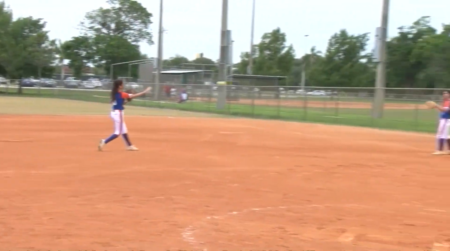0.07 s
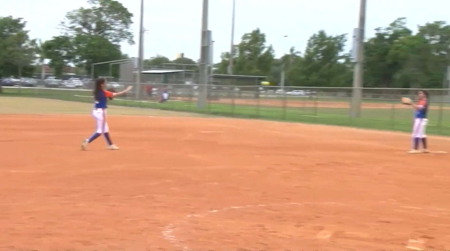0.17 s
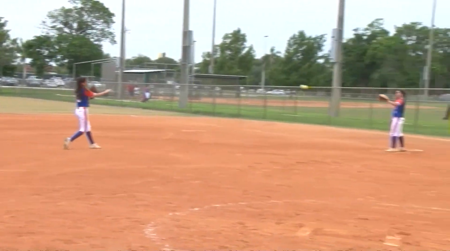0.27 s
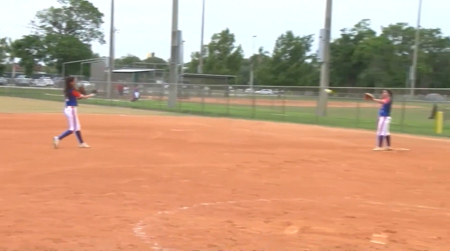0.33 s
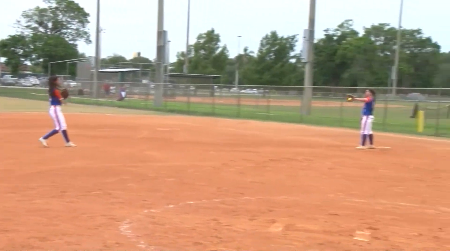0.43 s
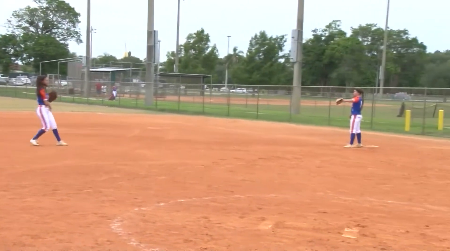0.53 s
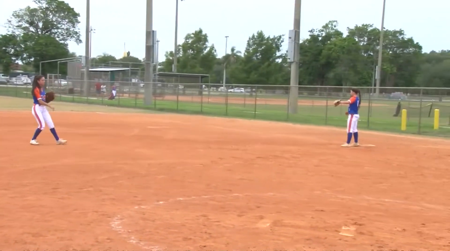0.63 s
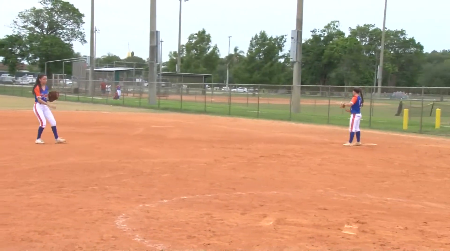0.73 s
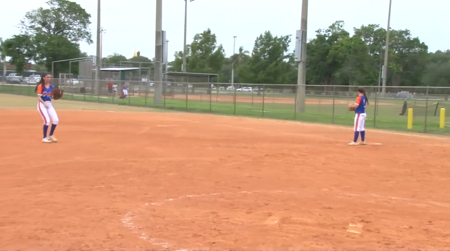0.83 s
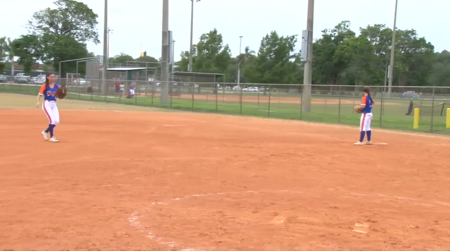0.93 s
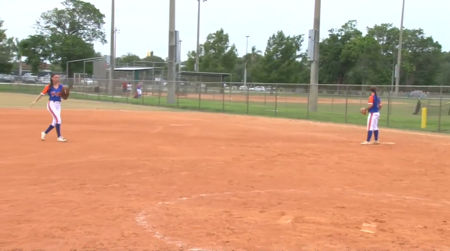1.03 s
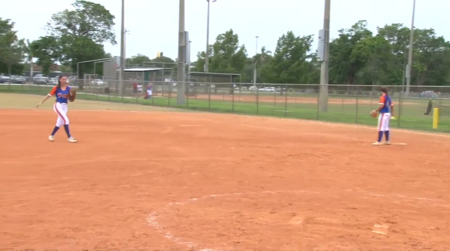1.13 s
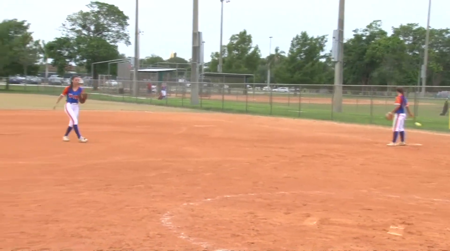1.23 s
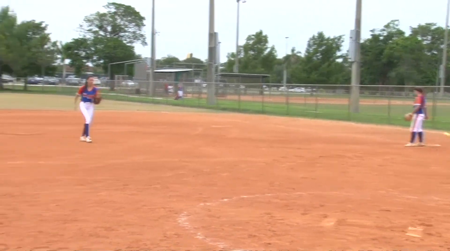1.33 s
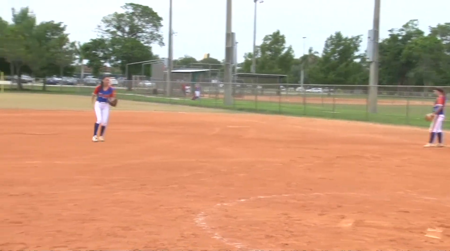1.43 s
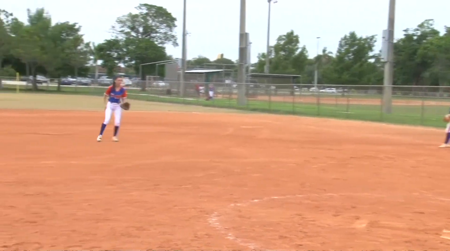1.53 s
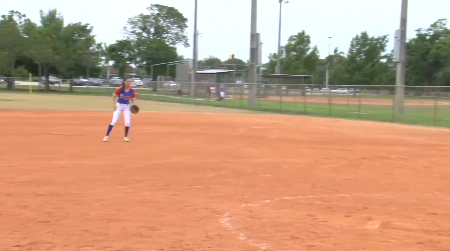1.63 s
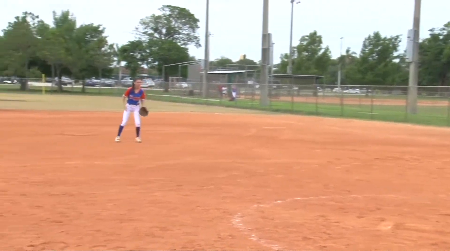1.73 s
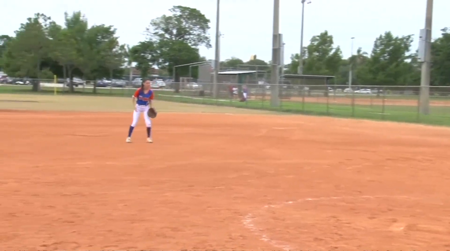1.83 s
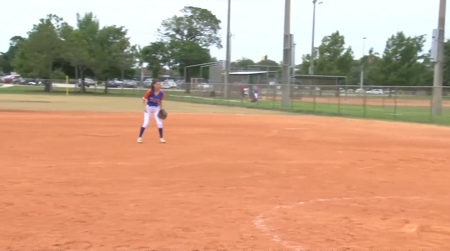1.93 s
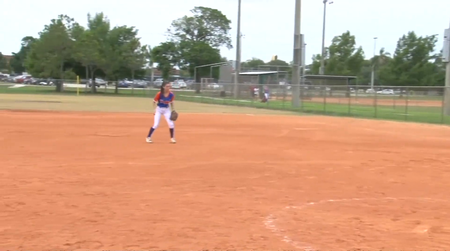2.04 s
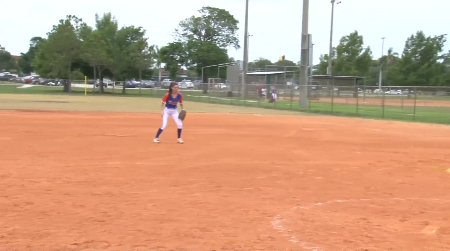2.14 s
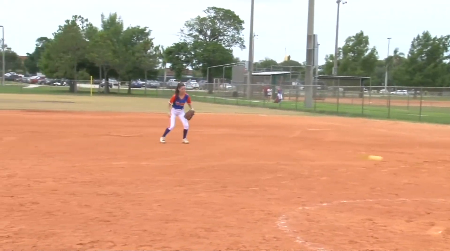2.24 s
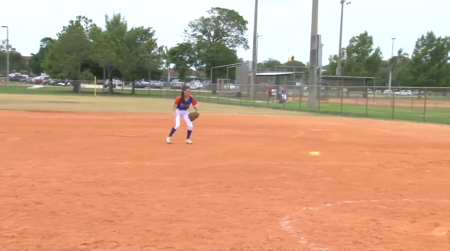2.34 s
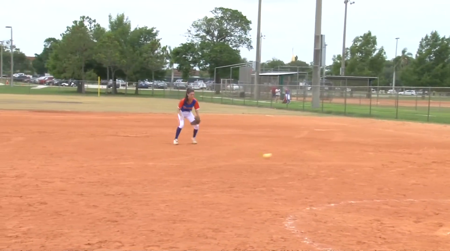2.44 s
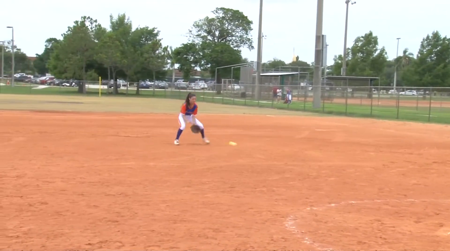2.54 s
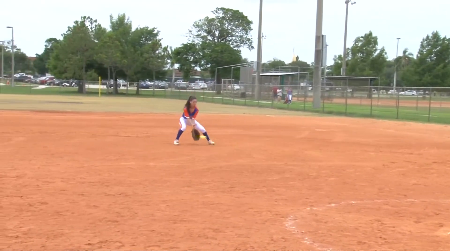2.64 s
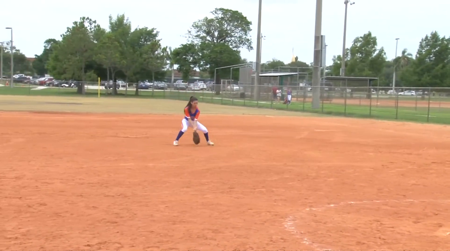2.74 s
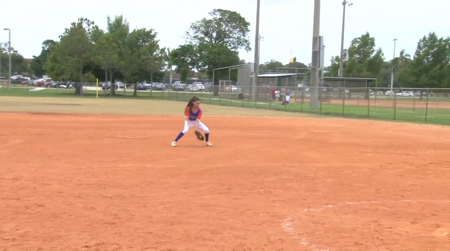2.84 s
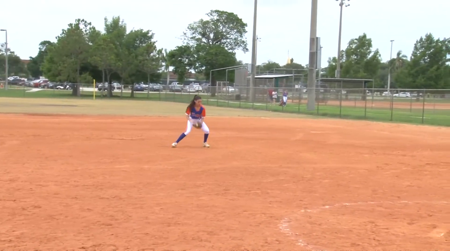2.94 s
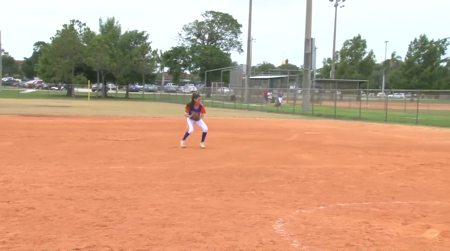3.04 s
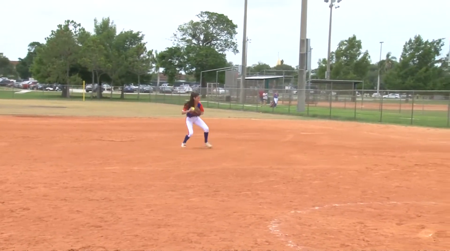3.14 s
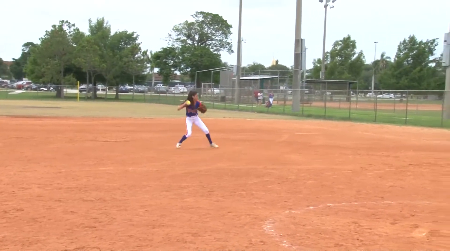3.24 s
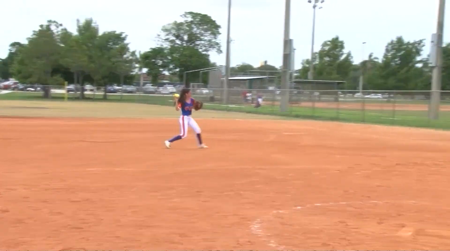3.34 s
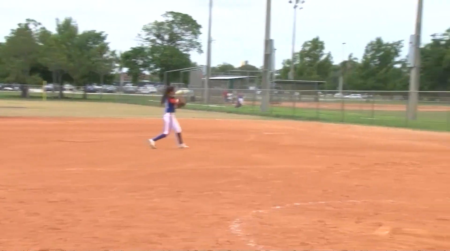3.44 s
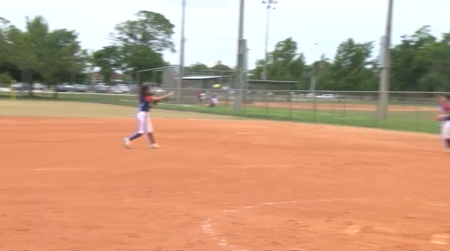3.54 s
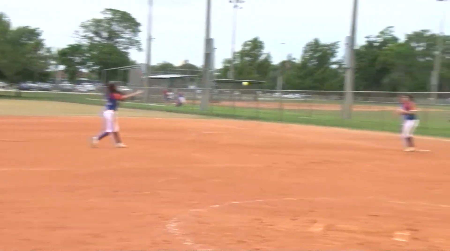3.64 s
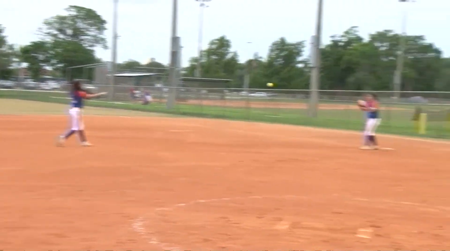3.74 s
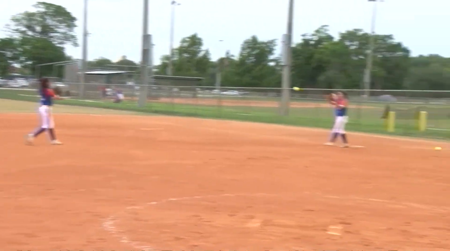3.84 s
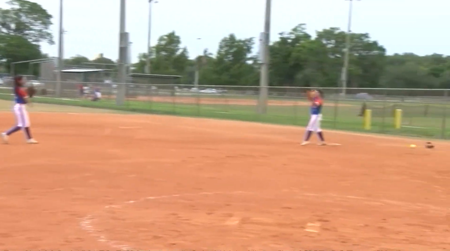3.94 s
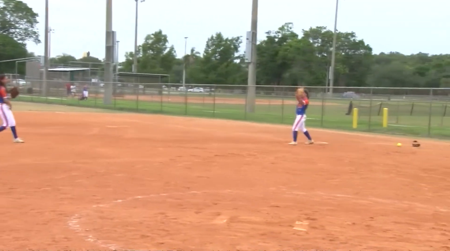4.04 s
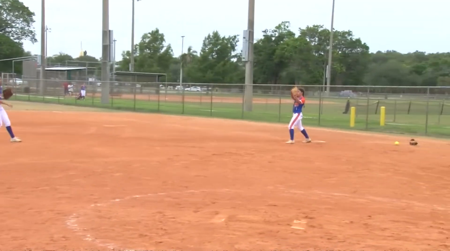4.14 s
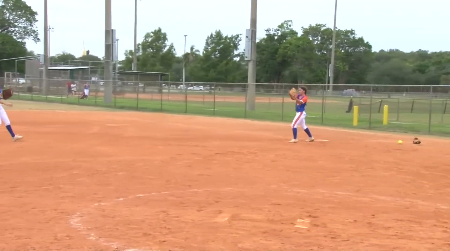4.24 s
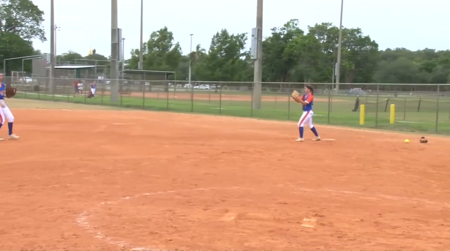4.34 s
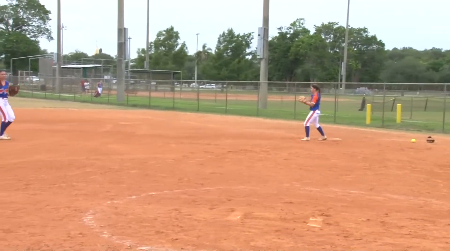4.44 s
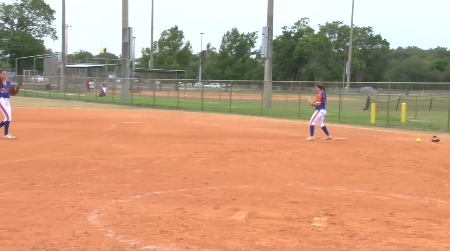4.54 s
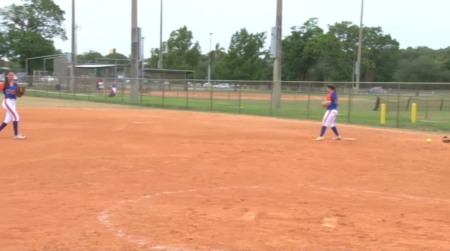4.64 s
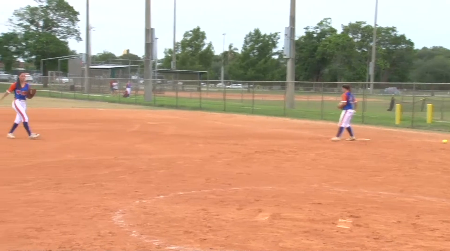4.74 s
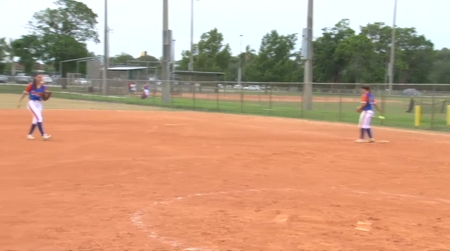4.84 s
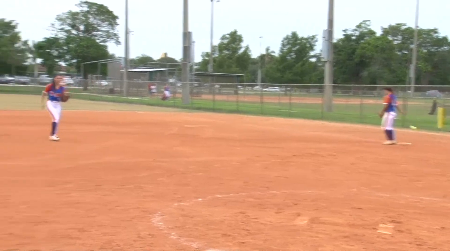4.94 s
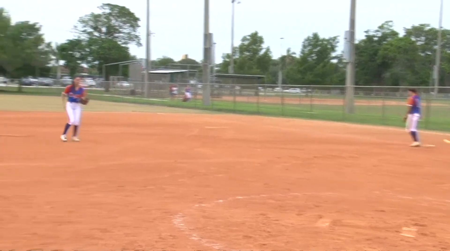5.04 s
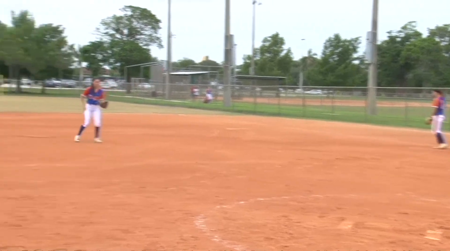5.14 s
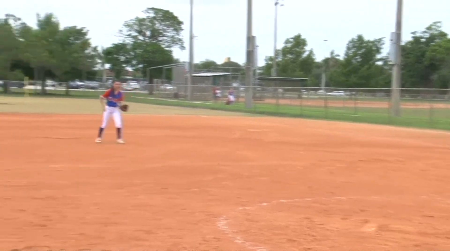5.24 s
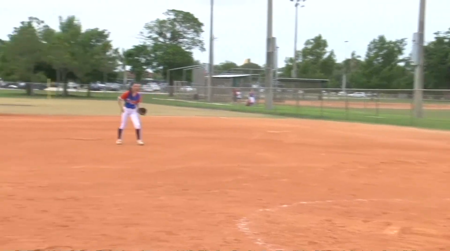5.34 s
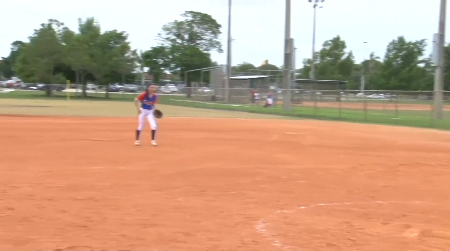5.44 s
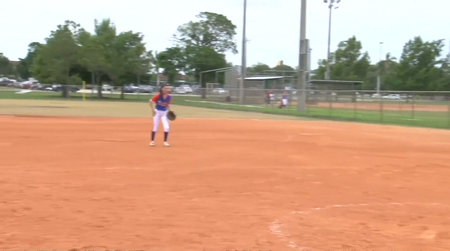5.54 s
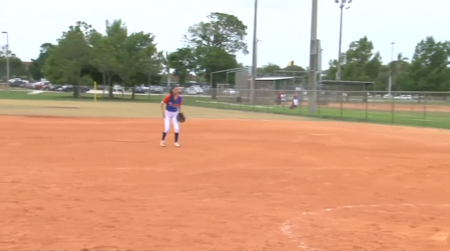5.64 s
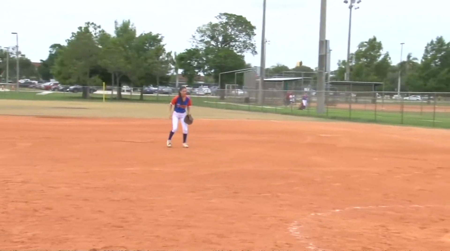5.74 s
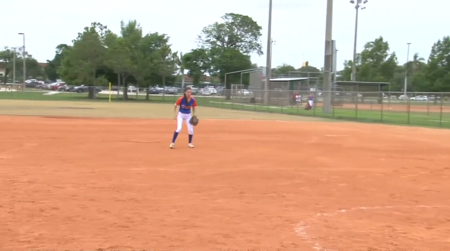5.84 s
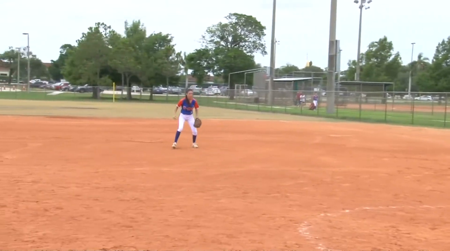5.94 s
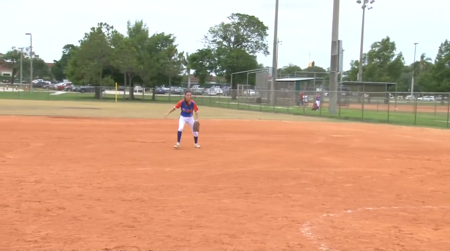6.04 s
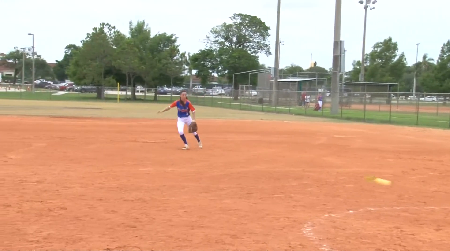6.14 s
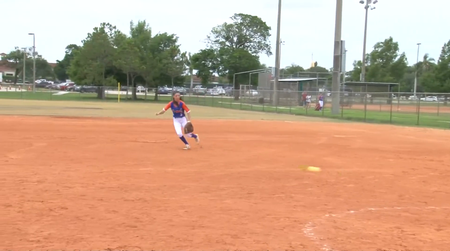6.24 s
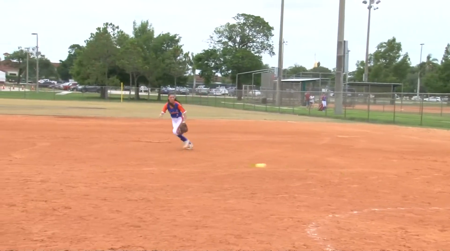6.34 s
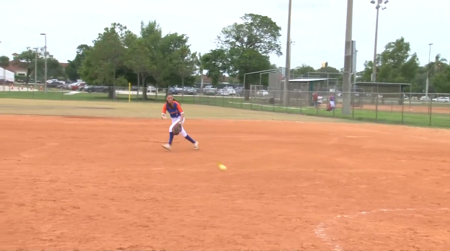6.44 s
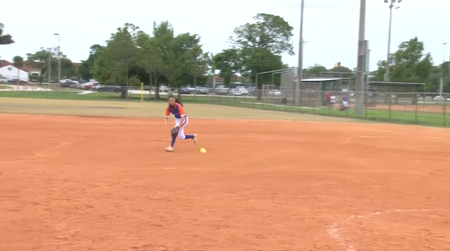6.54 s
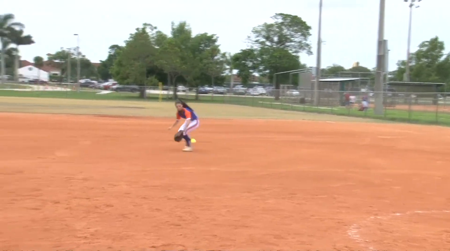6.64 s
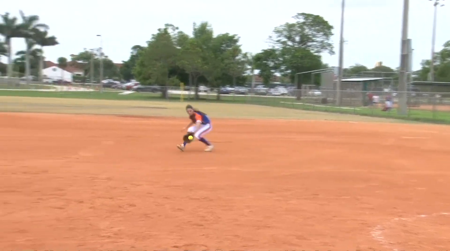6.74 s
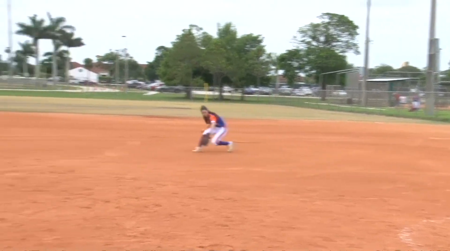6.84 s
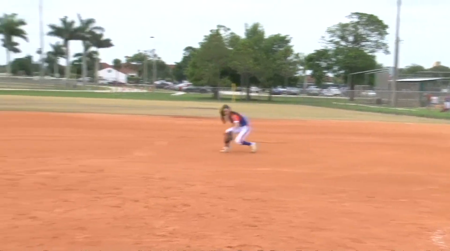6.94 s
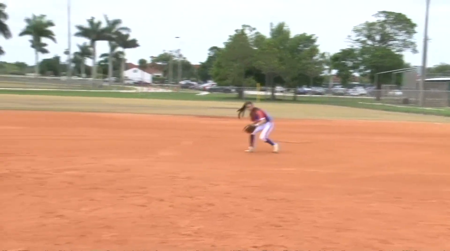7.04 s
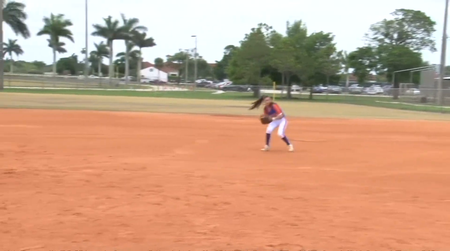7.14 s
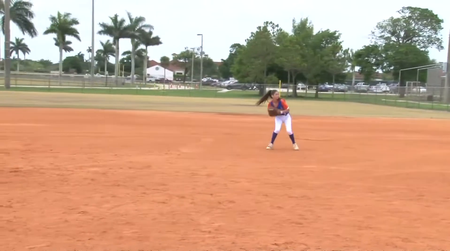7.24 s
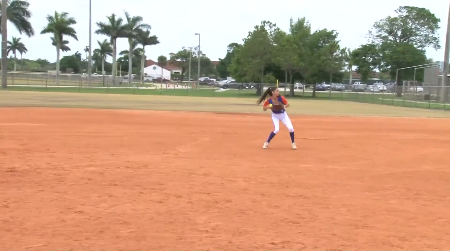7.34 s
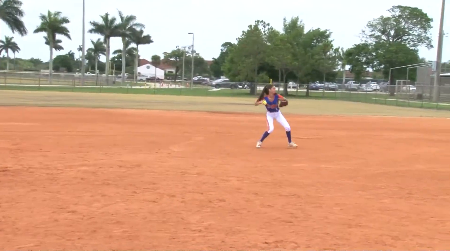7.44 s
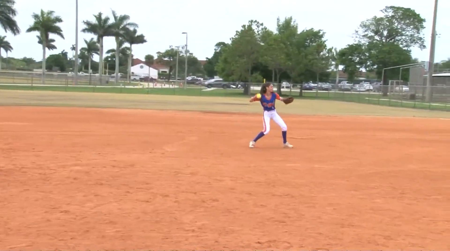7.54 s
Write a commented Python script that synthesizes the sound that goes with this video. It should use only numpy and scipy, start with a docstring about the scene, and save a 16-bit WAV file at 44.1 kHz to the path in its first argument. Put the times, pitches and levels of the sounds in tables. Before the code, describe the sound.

An open softball practice field with a low traffic hum, a soft distant wash and light wind rumble on the microphone. At 0.6 s a ball pops modestly into a leather glove with a gritty scuff and small echoes; a faint touch of leather follows at 1.0. Tiny falling chirps come around 1.5. At 1.9 a bat cracks sharply, with a crackling spray of echoes from fences and dugouts. The ball skips on clay at 2.15, then smacks hard into a glove at 2.9; another crisp glove smack lands at 4.1. Thin trilling and long drooping bird whistles sit behind, near 2.2, 4.7 and 6.3. Wind buffets harder from 5.5. A second bat crack at 5.8 echoes, clay ticks and thuds follow at 6.05 to 6.6, quick peeps come in threes, and a far metal ping sounds at 6.5. A deep glove thump lands at 6.95; gusty rumble and tree rush continue to 7.6.

```python
"""Wind rumbles on the microphone over humming traffic, then birds call: filtered noise and gliding sines.
At infield practice on an open softball field a ball skips over the clay and smacks into leather gloves,
and a bat knocks grounders: damped modes with short noise bursts. Dugouts, fences, ground and trees return
bat and glove hits as smeared noise. Metal pings once far off, and the wind is stronger towards the end."""
import sys
import numpy as np
from scipy import signal
from scipy.fft import rfft, irfft
from scipy.io import wavfile
from scipy.ndimage import uniform_filter1d

SR = 44100
rng = np.random.default_rng(int(sys.argv[2]) if len(sys.argv) > 2 else 0)


def unload_wav(signal):
    """Save mono or channel-first audio to the path in sys.argv[1] as 16-bit WAV at rate SR, clipped to [-1, 1]."""
    wavfile.write(
        sys.argv[1],
        SR,
        np.round(np.clip(np.atleast_2d(signal).T, -1, 1) * 32767).astype(np.int16),
    )


N = 335160
TIME = np.arange(N) / SR
PORT_LAG_S = 0.000454  # arrival difference between the two ports for sound far to one side


def from_db(db):
    """Logarithmic level: decibels to an amplitude gain."""
    return 10 ** (np.asarray(db) / 20)


def rms_one(x):
    """Power normalisation: scale to a mean square of one."""
    return x / np.sqrt(np.mean(x ** 2) + 1e-20)


def in_time(rows, start=0):
    """Linear interpolation: each column of a curve at every sample."""
    times, *columns = np.transpose(rows)
    return [np.interp(TIME - start, times, column) for column in columns]


def panned(x, pan_db):
    """Level difference between the ports: left minus right in dB."""
    return np.array([x * from_db(pan_db / 2), x * from_db(-pan_db / 2)])


def lagged(pair, lag_s):
    """Arrival-time difference: a positive lag delays the left port, as for sound from the right."""
    return np.array([np.interp(TIME - lag_s, TIME, pair[0]), pair[1]])


def colour_gain(spectrum, size, **beyond):
    """Spectral colour: gain at each Fourier bin, interpolated over log frequency."""
    hz, db = np.transpose(spectrum)
    bins = np.fft.rfftfreq(size, 1 / SR) + 1
    return from_db(np.interp(np.log(bins), np.log(hz), db, **beyond))


def noise(spectrum, channels=1):
    """Coloured Gaussian noise of unit power, uncorrelated between channels."""
    white = rfft(rng.standard_normal((channels, N)))
    return rms_one(irfft(white * colour_gain(spectrum, N, right=-110), N))


def drift(rate):
    """Slow random modulation: straight lines between normal draws, `rate` of them a second."""
    knots = rng.standard_normal(4096)
    return np.interp(TIME * rate, np.arange(len(knots)), knots)


def resonate(x, hz, width_hz):
    """Two-pole resonance with about unit gain at its peak; the width sets its damping."""
    radius = np.exp(-np.pi * width_hz / SR)
    zeros = (1 - radius * radius) / 2 * np.array([1, 0, -1])
    poles = [1, -2 * radius * np.cos(2 * np.pi * hz / SR), radius * radius]
    return signal.lfilter(zeros, poles, x)


def cut(x, hz, kind, order=2):
    """Butterworth low-pass or high-pass filtering."""
    return signal.sosfilt(signal.butter(order, min(hz, .45 * SR), kind, fs=SR, output="sos"), x)


def knock(s, hz, db, damping):
    """Impulse response of a heavily damped mode struck softly: two equal resonances in series."""
    click = signal.unit_impulse(2048)
    ring = resonate(resonate(click, hz, damping * hz), hz, damping * hz)
    return from_db(db) * np.pad(ring, (round(s * SR), N))[:N]


def contact(s, length_s, rise):
    """Exponential swell up to s, then decay to 1/e in length_s; rise is swell time over decay time."""
    t = (TIME - s) / length_s
    return np.exp(-np.minimum(np.maximum(t, -t / rise), 60))


def spatter(s, spectrum, length_s, rise, size=4096):
    """Transient noise: the spectrum sets its broad colour, chance leaves small peaks and dips."""
    start = round(s * SR) - size // 4
    envelope = np.pad(contact(s, length_s, rise), (0, size))[start:start + size]
    burst = rfft(rng.standard_normal(size) * envelope)
    evened = burst / np.sqrt(uniform_filter1d(abs(burst) ** 2, size=120) + 1e-20)
    grains = irfft(colour_gain(spectrum, size) * evened, size)
    return np.pad(grains, (start, N))[:N]


def tone(hz, waver):
    """Frequency modulation: a sine of unit power whose pitch trembles a little."""
    trembling_hz = hz * (1 + waver * drift(180))
    return np.sqrt(2) * np.sin(2 * np.pi * np.cumsum(trembling_hz) / SR)


# colour of turbulence at the microphone: (frequency [Hz], relative density [dB per Hz])
TURBULENCE_COLOUR = [(15, -9), (30, -11), (55, -2), (90, 3), (140, -4.5), (220, -16), (400, -37),
                     (900, -46.5)]
# gusts at the microphone: (time [s], strength before WIND_DB [dB], left over right [dB])
GUST_CURVE = [(0.0, -45.5, -8), (0.85, -44, -3), (1.25, -47, -3), (1.7, -44, 5.5), (2.15, -46.5, 9),
              (2.7, -41.5, 9), (3.0, -42, -3), (4.1, -43.5, -7), (4.6, -38.5, 2.5), (5.2, -42.5, -1),
              (5.38, -40, -1), (5.5, -33, 10), (5.72, -37.5, 9), (5.9, -34.5, 8), (6.4, -37.5, 9),
              (7.3, -35, 12), (7.6, -35.5, 3)]
# wind in the trees: (time [s], level [dB])
TREE_WIND_CURVE = [(0, -71), (4.0, -65), (4.25, -46.5), (4.6, -57.5), (5.8, -66.5), (6.2, -46.5),
                   (6.75, -50.5), (7.25, -44), (7.6, -44.5)]
# colour of the rush in the trees: (frequency [Hz], relative density [dB per Hz])
TREE_RUSH_COLOUR = [(150, -20), (300, -14.5), (450, -3.5), (600, -1), (850, -7), (1400, -19.5),
                    (3000, -33.5)]
WIND_DB = -3
EDDIES_FROM_DB = -32  # gust strength at which the deep eddies equal the turbulence


def wind():
    """Turbulent pressure: lumpy noise at each port; strong gusts add deep eddies, trees a soft rush."""
    gust_db, pan_db = in_time(GUST_CURVE)
    lumps = from_db(3.3 * np.array([drift(19), drift(6.9)]))
    deep = rms_one(cut(noise(TURBULENCE_COLOUR, channels=2), 50, "low"))
    eddies = from_db(1.1 * (gust_db - EDDIES_FROM_DB)) * deep
    turbulence = noise(TURBULENCE_COLOUR, channels=2)
    buffet = (turbulence + eddies) * lumps * panned(from_db(gust_db + WIND_DB), pan_db)
    rush = from_db(in_time(TREE_WIND_CURVE)[0]) * noise(TREE_RUSH_COLOUR, channels=2)
    return buffet + rush


# traffic hum over time: (time [s], level before HUM_DB [dB])
HUM_CURVE = [(0.0, -47.5), (4.82, -47), (5.78, -45), (6.52, -48), (7.17, -42.5), (7.6, -44)]
# colour of the hum: (frequency [Hz], relative density [dB per Hz])
HUM_COLOUR = [(40, -26.5), (70, -13), (97, -1), (125, -3), (150, -3), (185, -1), (230, -9), (300, -16.5),
              (450, -25.5), (900, -29)]
# colour of the steady far wash of tyres and leaves: (frequency [Hz], relative density [dB per Hz])
WASH_COLOUR = [(150, 0), (300, -3), (500, -1.5), (780, 3.5), (1100, 0.5), (1500, -4), (2100, -15),
               (3000, -15.5), (4300, -22.5), (6000, -29.5), (7200, -42.5), (9000, -76.5)]
HUM_DB, WASH_DB = 3, -50


def distance():
    """Partial coherence: hum and wash each mix noise shared by the ports, the road's from the right."""
    shared_hum = panned(noise(HUM_COLOUR)[0], -1.2)
    diffuse_hum = from_db(-3.5) * noise(HUM_COLOUR, channels=2)
    hum = from_db(in_time(HUM_CURVE)[0] + HUM_DB) * (shared_hum + diffuse_hum)
    road = lagged(panned(noise(WASH_COLOUR)[0], -1.3), PORT_LAG_S)
    diffuse_wash = from_db(1.5) * noise(WASH_COLOUR, channels=2)
    return hum + from_db(WASH_DB) * (road + diffuse_wash)


def glide(rows, waver, start=0):
    """Pitch and amplitude modulation: one bird note along its path of frequency and level."""
    hz, db = in_time(rows, start)
    sounding = (TIME > start + rows[0][0]) * (TIME < start + rows[-1][0])
    return sounding * from_db(db) * tone(hz, waver)


WHISTLE_BEND, WHISTLE_FADE_S = 1.7, 0.04  # exponent of the pitch arch; fade at each end


def whistle(s, length_s, crest_hz, crest, fall_hz, db, swell_db):
    """Pitch glide: a held note that swells unevenly and droops at the end."""
    along = np.clip((TIME - s) / length_s, 0, 1)
    hz = crest_hz - fall_hz * abs((along - crest) / (1 - crest)) ** WHISTLE_BEND
    fade = np.minimum(np.minimum(along, 1 - along) * length_s / WHISTLE_FADE_S, 1)
    level_db = db + swell_db * (along - 1) + 1.9 * drift(70)
    return fade * from_db(level_db) * tone(hz, waver=0.0068)


def through_trees(x, wet_db, t60_s):
    """Multiple scattering: many decaying paths through the leaves blur a call and make it flutter."""
    size = SR // 2
    paths = rng.standard_normal((2, size)) * from_db(-60 * TIME[:size] / t60_s)
    response = rms_one(paths) / np.sqrt(size)
    return x + from_db(wet_db) * signal.fftconvolve(x, response, axes=1)[:, :N]


# short falling notes: (time [s], length [s], start pitch [Hz], end pitch [Hz],
# level before the trees [dB], left over right [dB])
FALLING_NOTES = [(0.292, 0.041, 4170, 3630, -69, -4), (1.447, 0.035, 5530, 4450, -75, 7),
                 (1.548, 0.037, 5570, 4420, -71, 10), (1.655, 0.037, 5500, 4180, -67, 8),
                 (3.419, 0.025, 3220, 2850, -64, -11.5), (4.587, 0.042, 3880, 3560, -63, 7),
                 (6.033, 0.06, 3730, 2950, -63, 10.5), (6.414, 0.1, 4000, 3140, -65, 8),
                 (6.843, 0.06, 3800, 3400, -71, 9), (6.891, 0.044, 3100, 2730, -60, 11),
                 (7.31, 0.058, 3530, 2750, -67, 9)]
# one bird's long whistles: (time [s], length [s], crest pitch [Hz], crest place [share of length],
# pitch fall [Hz], level near the end before far gain and trees [dB], swell [dB])
LONG_WHISTLES = [(0.713, .3, 3285, 0.3, 460, -66, 0), (2.182, 0.295, 3310, 0.36, 470, -58, 9),
                 (4.68, 0.235, 3330, 0.049, 440, -57, 16), (6.243, .31, 3330, 0.17, 500, -54, 19),
                 (7.364, 0.2, 3203, 0.13, 402, -61.5, 5)]
# a thin far trill: (time [s], pitch [Hz], level before flutter [dB])
FAR_TRILL = [(2.1, 3745, -82), (2.2, 3750, -69), (2.42, 3740, -82), (2.55, 3740, -71), (2.85, 3760, -64),
             (3.2, 3760, -70), (3.6, 3730, -72), (4.0, 3730, -66), (4.25, 3730, -64.5), (4.6, 3715, -82)]
# another bird's hooked peep: (time from its start [s], pitch [Hz], relative level [dB])
PEEP_PATH = [(0, 2550, -10), (.007, 2310, 5), (.016, 2075, 1.5), (.0195, 2260, 3), (.023, 2780, -8)]
# its peeps, mostly in threes: (time [s], gain on the peep before the trees [dB])
PEEP_CALLS = [(6.152, -59.5), (6.225, -58.5), (6.306, -60), (6.571, -58.5), (6.649, -57.5), (6.729, -56.5),
              (6.987, -59), (7.065, -59.5), (7.146, -61), (7.506, -64)]


def birds():
    """Frequency-modulated tones: whistles from the right, nearer peeps and short notes, a thin trill."""
    far = panned(sum(whistle(*call) for call in LONG_WHISTLES), -17.5)
    peeps = sum(from_db(db) * glide(PEEP_PATH, waver=0.0068, start=s) for s, db in PEEP_CALLS)
    near = panned(peeps, 3.6)
    for s, length_s, start_hz, end_hz, db, pan_db in FALLING_NOTES:
        along = np.clip((TIME - s) / length_s, 0, 1)
        falling = tone(start_hz + (end_hz - start_hz) * along, waver=0.009)
        near += panned(from_db(db) * np.sin(np.pi * along) * falling, pan_db)
    trill = glide(FAR_TRILL, waver=.004) * from_db(3.5 * drift(130))  # the level flutters
    blurred_far = from_db(-2.5) * through_trees(far, wet_db=-5.5, t60_s=0.16)
    return blurred_far + through_trees(near, wet_db=-6.5, t60_s=0.16) + trill


# ball and shoes on the clay; the row at 6.987 s is a low thud, perhaps a bump on the microphone:
# (time [s], thud drive [dB], grit gain [dB], grit tilt about 2 kHz [dB per octave],
# grit decay to 1/e [s], left over right [dB])
THUDS_AND_GRIT = [(0.606, 3.5, -12, -4, 0.0018, 11), (0.9835, -14, -25, -2, 0.0015, 8),
                  (1.313, -18, -26, -4, 0.0037, 16), (1.627, 1.5, -41, 2, 0.0036, 12.5),
                  (2.148, -6, -24, 0, 0.0015, 9), (2.16, 10.5, -12.5, 0.5, 0.0012, 13),
                  (2.637, 6, -27.5, -0.5, 0.002, 13.5), (5.274, 0, -32, -0.5, 0.008, 13.5),
                  (6.054, -0.5, -28.5, -2.5, 0.0041, 13), (6.1676, 9.5, -16, 4.5, 0.0015, 9),
                  (6.357, -15, -29.5, -2.5, 0.004, 17), (6.625, 1.5, -25.5, 1.5, 0.0031, 14.5),
                  (6.987, 15, -41, -3, 0.0023, 8), (7.563, 7, -23, -7, 0.002, 1)]
# colour of the grit before gain and tilt: (frequency [Hz], relative density [dB per Hz])
GRIT_COLOUR = [(300, 1.5), (800, 16.5), (1600, 4), (2400, 5.5), (4000, 6), (7000, -3.5), (9000, -21),
               (12000, -50)]


def clay():
    """Inelastic impact: a heavily damped thud and a short spray of grit, off to the left."""
    out = 0
    for s, thud_db, grit_db, tilt_db, grit_s, pan_db in THUDS_AND_GRIT:
        colour = [(hz, db + grit_db + tilt_db * np.log2(hz / 2000)) for hz, db in GRIT_COLOUR]
        thud = knock(s, 283, thud_db, damping=1.38)
        grit = spatter(s + 0.0011, colour, grit_s, rise=0.88)
        out = out + panned(thud + grit, pan_db)
    return lagged(out, -PORT_LAG_S)


# ball into glove, settling in it or lifted out: (time [s], palm thump [Hz], thump drive [dB],
# pocket [Hz], pocket drive [dB], crack [Hz], crack drive [dB], crack damping [width over pitch],
# slap gain [dB], slap decay to 1/e [s], left over right [dB], scatter gain [dB])
GLOVE_HITS = [(0.6135, 225, 12.5, 1070, 12.5, 2800, 1, 0.3, -4, 0.0024, 11, -49),
              (0.6178, 248, 4, 1060, 11, 2900, 2, 0.36, -10.5, 0.002, 8, -57),
              (0.996, 250, -16, 1700, -7, 2900, -10.5, 0.33, -19.5, 0.0056, -6, -69),
              (2.8617, 253, 23.5, 560, 26, 3250, 20.5, 0.55, 10, 0.0011, 5, -48),
              (4.115, 290, 20.5, 1450, 8, 2530, 20, 0.28, 2.5, 0.0013, 11, -45),
              (6.955, 193.5, 17.5, 610, 20.5, 2650, 15, 0.42, 3, 0.0021, 7.5, -47.5)]
# colour of the leather slap before its gain: (frequency [Hz], relative density [dB per Hz])
LEATHER_COLOUR = [(200, -13), (500, -3), (850, 5), (1500, 0.5), (2600, 1), (4300, 3), (6000, -3.5),
                  (8000, -10), (10000, -19), (15000, -50)]
CRACK_DELAY_S, SLAP_DELAY_S = .0005, .001  # after the ball meets the palm


def gloves():
    """Damped modes: the palm thumps, air in the pocket pops, leather cracks and folds round the ball."""
    out = 0
    for (s, thump_hz, thump_db, pocket_hz, pocket_db, crack_hz, crack_db, damping,
         slap_db, slap_s, pan_db, _) in GLOVE_HITS:
        thump = knock(s, thump_hz, thump_db, damping=0.91)
        pocket = knock(s, pocket_hz, pocket_db, damping=0.55)
        crack = knock(s + CRACK_DELAY_S, crack_hz, crack_db, damping)
        slap = from_db(slap_db) * spatter(s + SLAP_DELAY_S, LEATHER_COLOUR, slap_s, rise=0.8)
        out = out + panned(thump - pocket + crack + slap, pan_db)  # the pocket has opposite polarity
    return lagged(out, .00007)


# what scatters each bat and glove hit, from the ground nearby to the far fences:
# (delay [s], relative level [dB], decay to 1/e [s])
SCATTER_PATHS = [(.004, -6, 0.015), (0.04, -6, 0.033), (.081, -4, 0.023), (.125, -17, 0.055)]
# colour of the scattered spray: (frequency [Hz], relative density [dB per Hz])
SCATTER_COLOUR = [(300, -17), (700, 0), (1500, 7.5), (2600, 5.5), (4500, -3.5), (6500, -10), (9000, -21),
                  (11500, -52)]
SCATTER_RISE, SCATTER_GRAIN_DB = 0.18, 3  # swell time over decay time; unevenness


def scatter():
    """Diffuse reflection: ground and trees return a grainy spray after every bat and glove hit."""
    spray = noise(SCATTER_COLOUR, channels=2) * from_db(SCATTER_GRAIN_DB * drift(300))
    power = 0
    for s, *_, scatter_db in BAT_HITS + GLOVE_HITS:
        for delay_s, db, decay_s in SCATTER_PATHS:
            envelope = contact(s + delay_s, decay_s, SCATTER_RISE)
            power = power + (from_db(scatter_db + db) * envelope) ** 2
    return spray * np.sqrt(power)


# single echoes off dugouts and walls; the first row is a small further slap of the glove:
# (time [s], low [dB], middle [dB], treble [dB], smear, decay to 1/e [s], left over right [dB]);
# the bands anchor the colour curve
SLAP_AND_ECHOES = [(0.6255, -12, -13, -21, 0.0016, 6), (0.6646, -10.5, -25, -16, 0.0018, -7),
                   (0.6928, -8, -4.5, -19, 0.0034, 9), (0.7095, 2.5, -9.5, -34, 0.0062, -2),
                   (1.9275, -6, -3, -16, 0.0027, -12), (1.936, -11, -2, -14, 0.0027, -6),
                   (1.951, -16.0, -11.0, -15.5, 0.0018, -4), (1.9669, -10, -5, -16, 0.003, 3),
                   (1.975, -13.0, -10, -17, 0.0033, 2), (1.982, -9, -6.5, -15, 0.0018, 4),
                   (2.888, 2, -22, -34, 0.0036, -6), (2.897, -14, -26, -30.5, 0.0018, 0),
                   (2.92, -6, -10, -12, 0.002, -10), (2.927, -9.5, -22, -17, 0.0019, -5),
                   (2.938, 4, -11, -16, 0.0053, 0), (2.977, 7, -12, -10, 0.0019, -6),
                   (4.128, -7.0, -14.5, -21, 0.0018, 2), (4.132, -16.5, -17, -21.5, 0.0018, 4),
                   (4.1568, -14, -9.0, -22, 0.0018, 9), (4.166, -3, -9, -20.0, 0.0048, -2),
                   (4.1755, -16.0, -9.5, -30, 0.0018, -6), (4.185, -16, -3, -25, 0.0018, 9),
                   (4.2087, -5, -2.0, -24, 0.0018, -3), (5.8312, -13, -14, -18, 0.0019, -2),
                   (5.8392, -6.5, -13, -18.0, 0.0018, -5), (5.857, -18, -17.0, -23.5, 0.0018, -3),
                   (5.8758, -16.5, -9, -19, 0.002, 6), (5.8875, 0, -11, -13.5, 0.002, 6),
                   (7.01, -13.5, -30, -38, 0.0018, -2), (7.076, -11, -14.5, -30.5, 0.006, -3)]


def echoes():
    """Reflection and absorption: rough walls smear and colour a crack, air dulls it; first a glove slap."""
    out = 0
    for s, low_db, middle_db, treble_db, smear_s, pan_db in SLAP_AND_ECHOES:
        colour = [(200, low_db - 14.5), (700, low_db - 2), (1800, middle_db),
                  (4800, treble_db), (7500, treble_db - 10), (12000, treble_db - 44.5)]
        out = out + panned(spatter(s, colour, smear_s, rise=0.55), pan_db)
    return out


# crackling returns off fences and bleachers: (time [s], level before unevenness [dB],
# decay to 1/e [s], centre [Hz], left over right [dB])
FENCE_CRACKLES = [(0.658, -57, 0.027, 5000, 1), (1.937, -43, 0.02, 2700, -5),
                  (1.979, -45.5, 0.027, 2490, 4), (2.934, -43.5, 0.017, 3900, 1),
                  (4.172, -41.5, 0.02, 2000, -6), (4.215, -48, 0.016, 2000, -8),
                  (4.187, -55, 0.013, 6460, 6), (5.882, -46, 0.02, 2200, 1), (7.015, -58, 0.027, 4000, 3),
                  (7.075, -58, 0.012, 4000, 3)]
CRACKLE_WIDTH, CRACKLE_RISE = 0.62, 0.4  # width over pitch; swell time over decay time
CRACKLE_GRAIN_DB = 4  # unevenness
POST_DELAY_S, POST_STEP_S = 0.14, .0142  # first fence post after a bat crack; spacing of the rest


def fences():
    """Dense scattering: wire, posts and benches crackle; a row of posts on the left ticks after the bat."""
    out = 0
    uneven = rng.standard_normal((2, N)) * from_db(CRACKLE_GRAIN_DB * drift(450))
    grains = cut(uneven, 5800, "low", order=6)
    for s, db, decay_s, hz, pan_db in FENCE_CRACKLES:
        width_hz = CRACKLE_WIDTH * hz
        colour = rms_one(resonate(resonate(grains, hz, width_hz), hz, width_hz))
        out = out + colour * panned(from_db(db) * contact(s, decay_s, CRACKLE_RISE), pan_db)
    ticks = 0
    for s, *_, post_db, _, _ in BAT_HITS:
        for post in range(5):
            tick_s = s + POST_DELAY_S + POST_STEP_S * post
            ticks = ticks + from_db(post_db) * contact(tick_s, 0.0018, rise=.5)
    return out + panned(ticks * rms_one(cut(grains[0], 3300, "high")), 14)


# bat on ball: (time [s], low mode [Hz], low drive [dB], high mode [Hz], high drive [dB],
# low mode damping [width over pitch], snap gain [dB], snap delay [s], barrel ring [dB],
# fence post ticks [dB], left over right [dB], scatter gain [dB])
BAT_HITS = [(1.8863, 732, 26, 1646, 25, 0.44, -11.5, .0028, -56, -51.5, 2.5, -28.5),
            (5.7920, 865, 21.5, 1730, 22.5, 0.98, 1, .0008, -38.5, -54, 7.5, -33.5)]
# colour of the cover's snap before its gain: (frequency [Hz], relative density [dB per Hz])
SNAP_COLOUR = [(1500, -20), (3000, 1), (4500, 5), (6000, -5), (7500, -2.5), (10000, -13), (15000, -28)]
BARREL_HZ, BARREL_T60_S = 1420, 0.31


def bats():
    """Modal impact: ball and bat knock for a few cycles, the cover snaps, the barrel rings faintly on."""
    out = 0
    for (s, low_hz, low_db, high_hz, high_db, damping, snap_db, snap_delay_s,
         ring_db, _, pan_db, _) in BAT_HITS:
        body = knock(s, low_hz, low_db, damping) + knock(s, high_hz, high_db, .7 * damping)
        banded_body = cut(cut(body, 300, "high"), 2930, "low")
        snap = from_db(snap_db) * spatter(s + snap_delay_s, SNAP_COLOUR, 0.00066, rise=0.23)
        age = np.maximum(TIME - s, 0)
        decay_db = np.minimum(60 * age / BARREL_T60_S, 200)
        ring = from_db(ring_db - decay_db) * np.sin(2 * np.pi * BARREL_HZ * age)
        out = out + panned(banded_body + snap + ring, pan_db)
    return lagged(out, -0.00013)


# a far metallic ping, perhaps a bat on another field; the 2840 Hz row is instead the drooping tail
# of the bird's long whistle, on the right:
# (pitch [Hz], level [dB], decay to 1/e [s], left over right [dB])
PING_AND_WHISTLE_TAIL = [(1810, -52.5, 0.03, 16.5), (1780, -61, 0.23, 20), (2840, -61, .025, -22),
                         (4700, -61, .016, 11)]
PING_S, PING_RISE_S = 6.497, 0.011


def ping():
    """Decaying partials: far metal rings with a smeared attack, as a bird's whistle tails off."""
    out = 0
    for hz, db, decay_s, pan_db in PING_AND_WHISTLE_TAIL:
        envelope = contact(PING_S, decay_s, rise=PING_RISE_S / decay_s)
        out = out + panned(from_db(db) * envelope * tone(hz, waver=0.008), pan_db)
    return out


def scene():
    """Superposition: hits and their echoes add to the open-air background."""
    background = wind() + distance() + birds()
    hits = clay() + gloves() + bats() + ping()
    returns = scatter() + echoes() + fences()
    return background + hits + returns


TREBLE_HZ, CUTOFF_HZ = 11500, 16100  # the treble falls away above the first and is gone by the second


def record(dry):
    """Overload and band-limiting: peaks beyond full scale clip, then the top is dulled and cut."""
    edge_fade = np.minimum(np.minimum(TIME, TIME[-1] - TIME) / .004, 1)
    dulled = cut(np.clip(dry * edge_fade, -1, 1), TREBLE_HZ, "low")
    return signal.sosfilt(signal.cheby2(12, 60, CUTOFF_HZ, fs=SR, output="sos"), dulled)


dry = scene()
out = record(dry)
unload_wav(out)
```